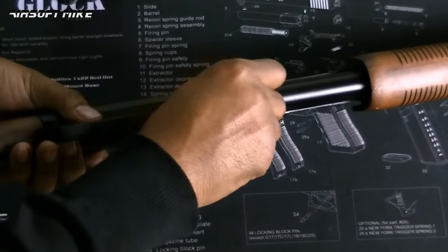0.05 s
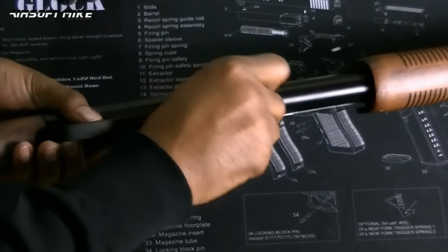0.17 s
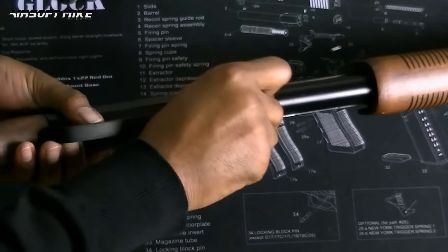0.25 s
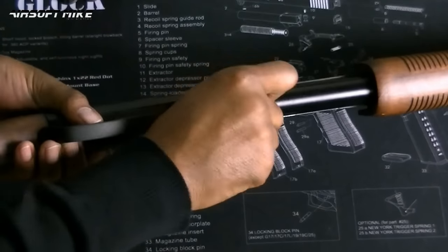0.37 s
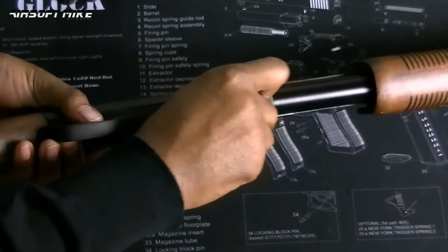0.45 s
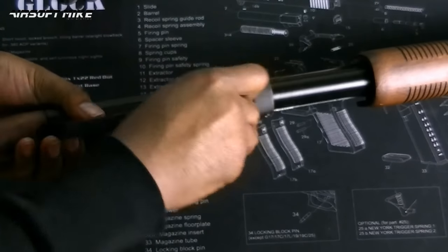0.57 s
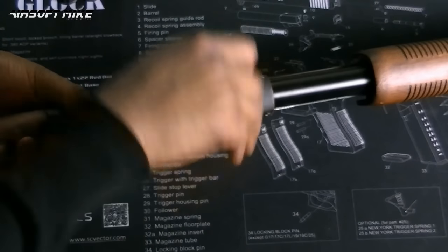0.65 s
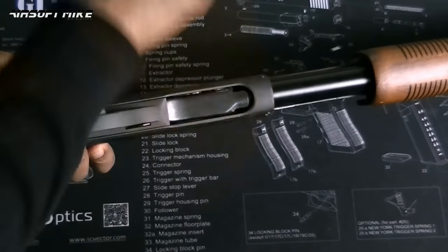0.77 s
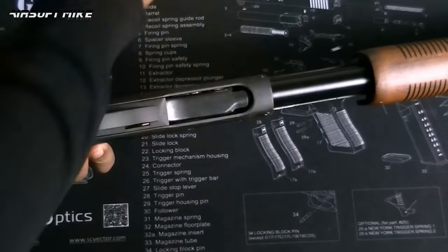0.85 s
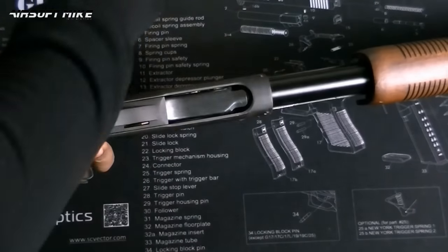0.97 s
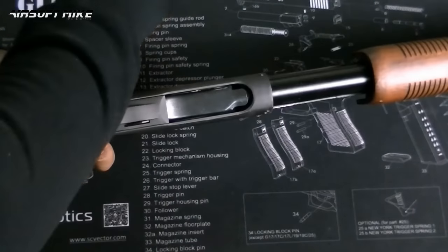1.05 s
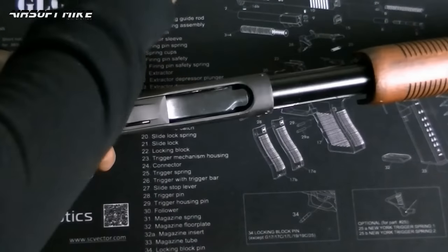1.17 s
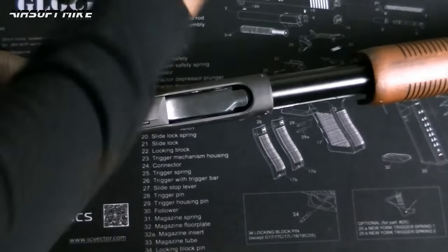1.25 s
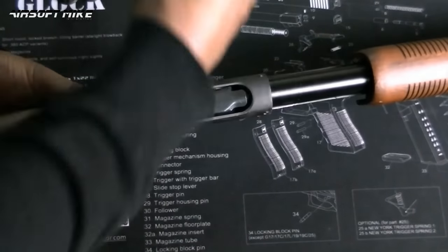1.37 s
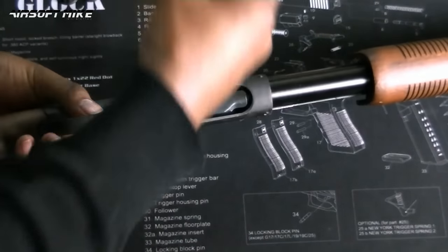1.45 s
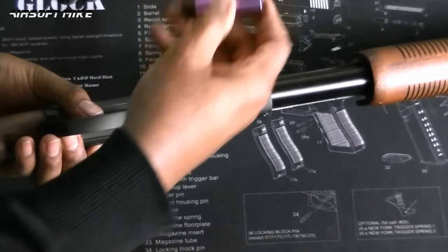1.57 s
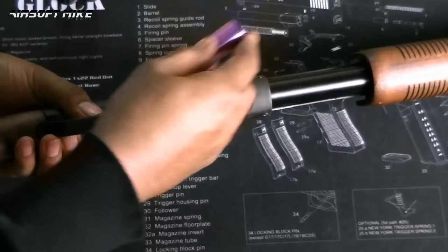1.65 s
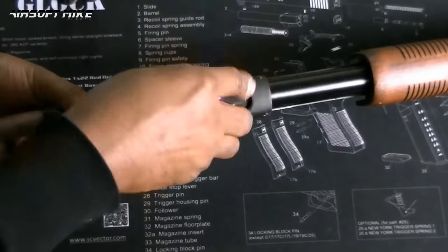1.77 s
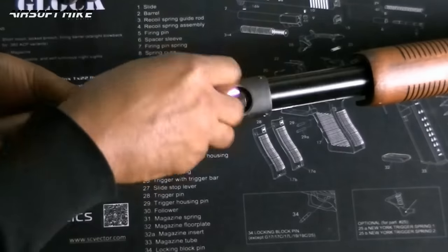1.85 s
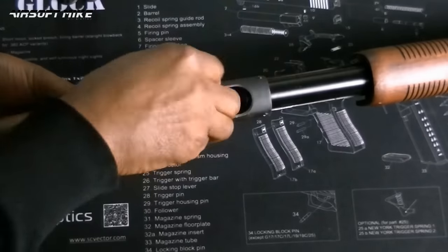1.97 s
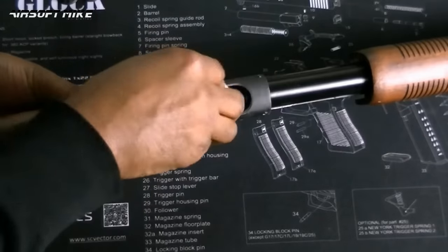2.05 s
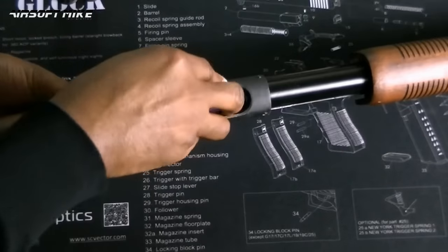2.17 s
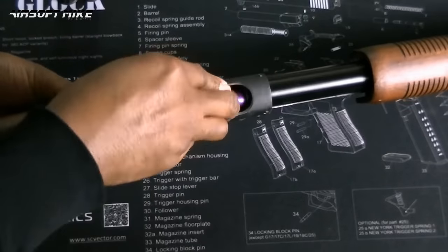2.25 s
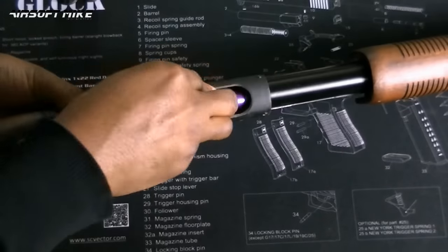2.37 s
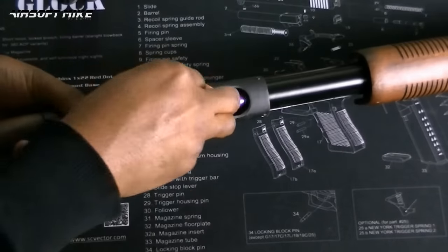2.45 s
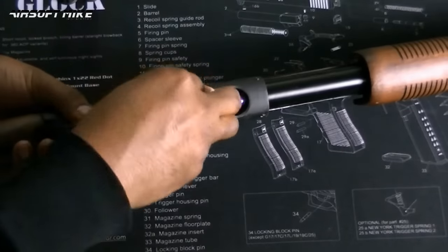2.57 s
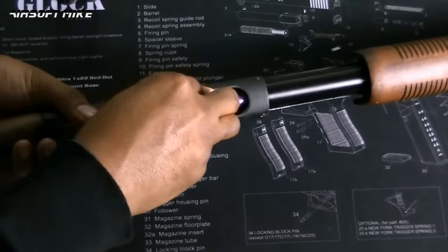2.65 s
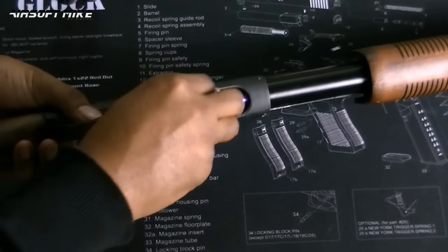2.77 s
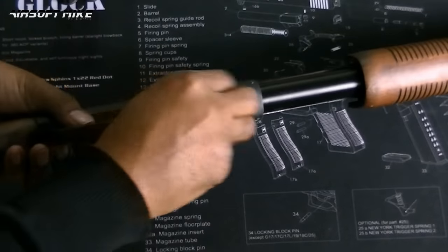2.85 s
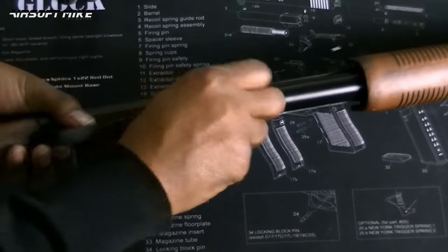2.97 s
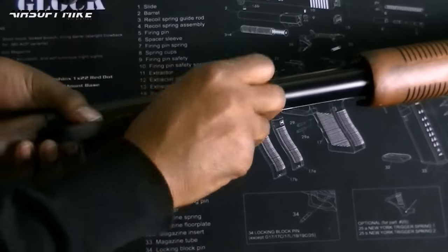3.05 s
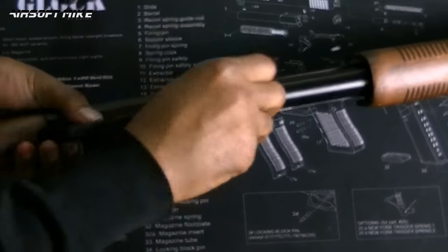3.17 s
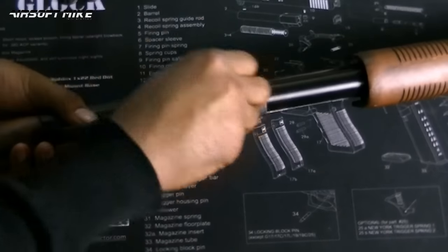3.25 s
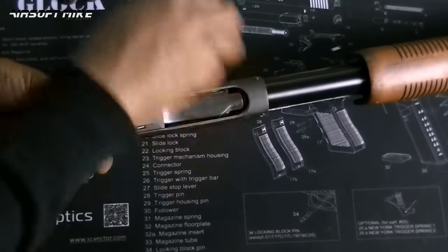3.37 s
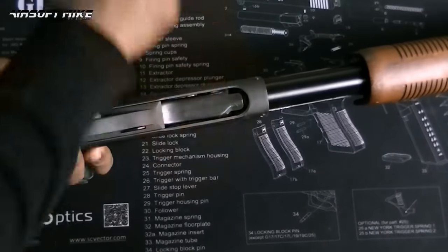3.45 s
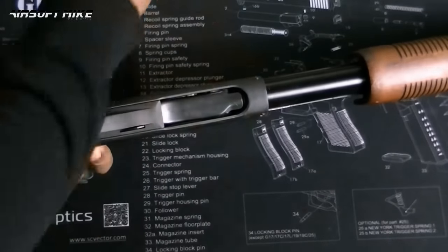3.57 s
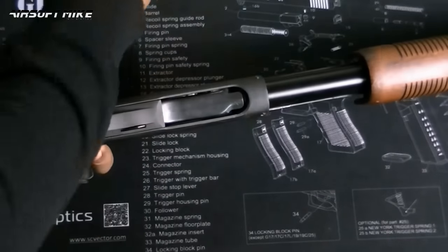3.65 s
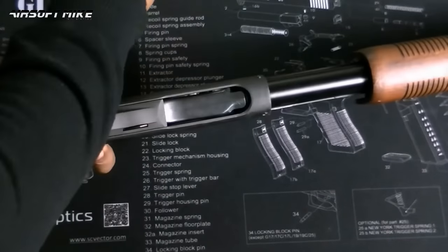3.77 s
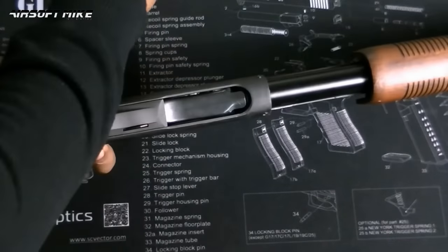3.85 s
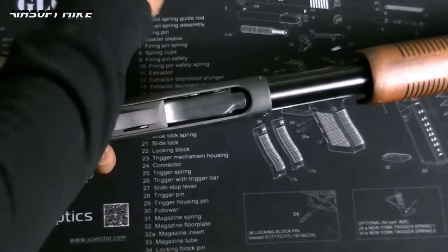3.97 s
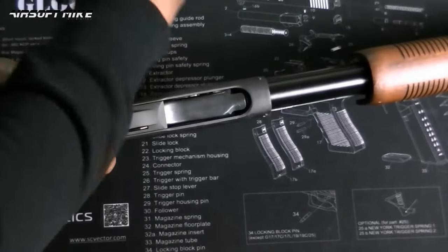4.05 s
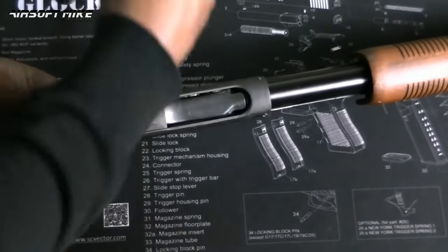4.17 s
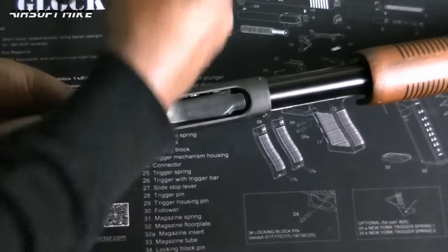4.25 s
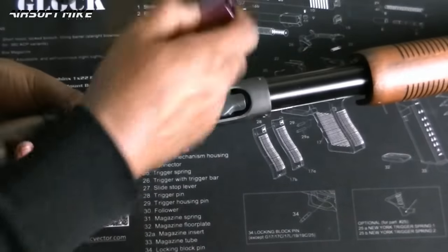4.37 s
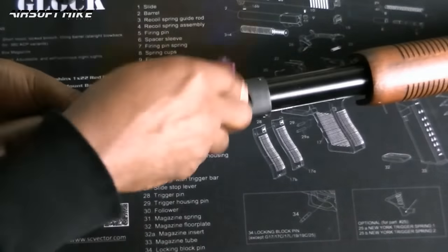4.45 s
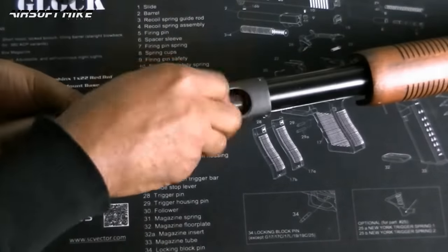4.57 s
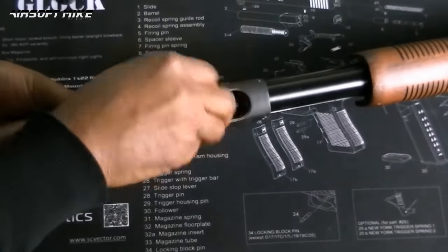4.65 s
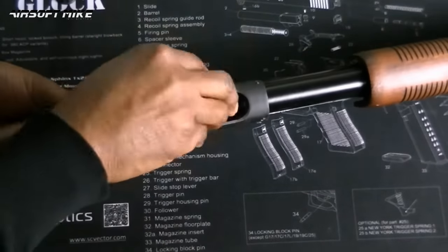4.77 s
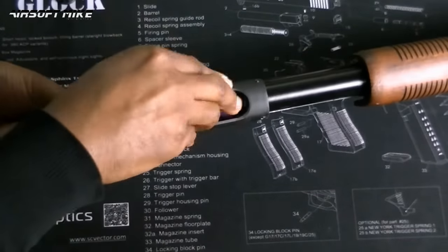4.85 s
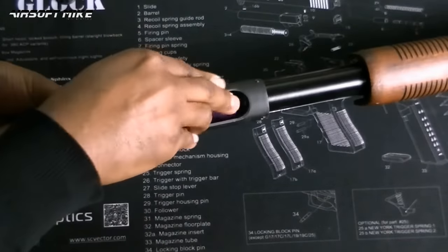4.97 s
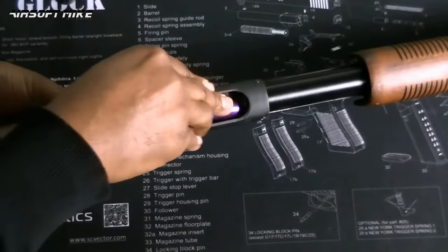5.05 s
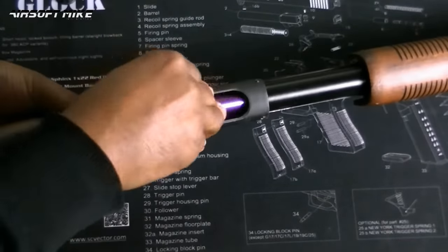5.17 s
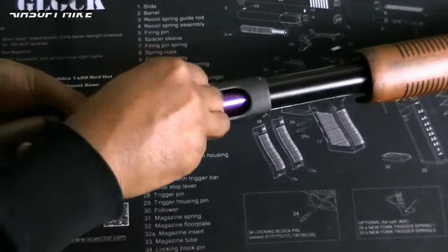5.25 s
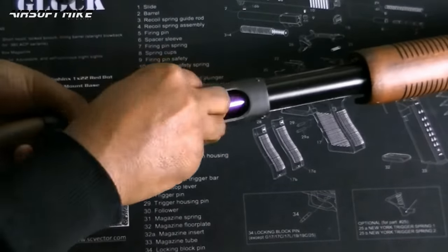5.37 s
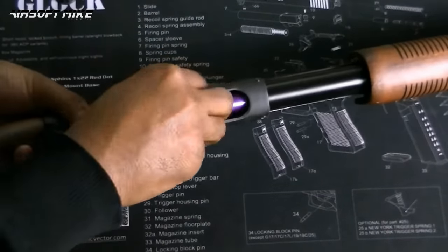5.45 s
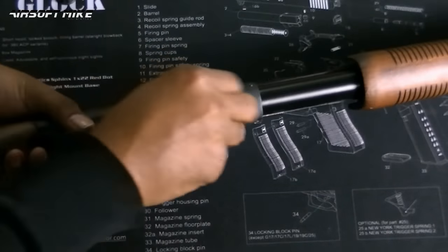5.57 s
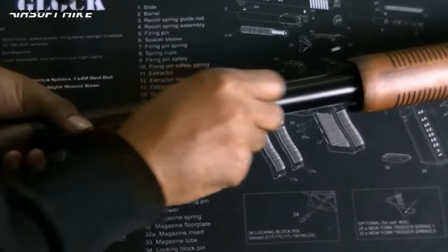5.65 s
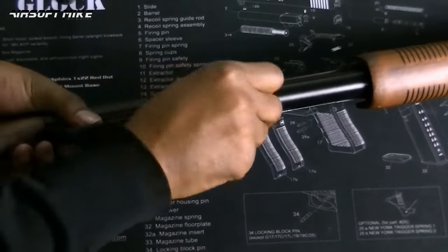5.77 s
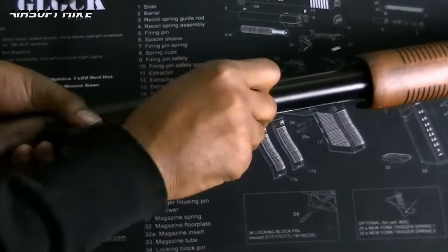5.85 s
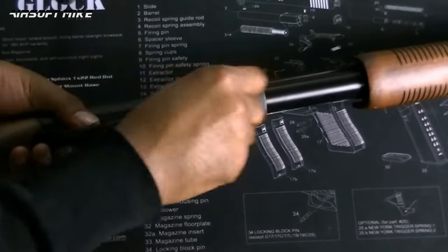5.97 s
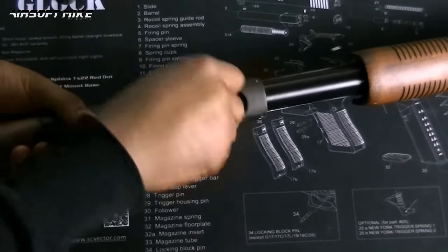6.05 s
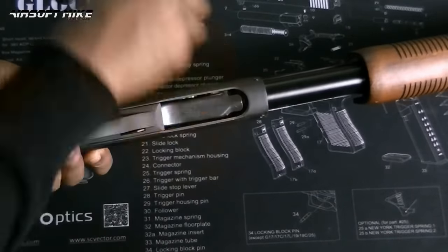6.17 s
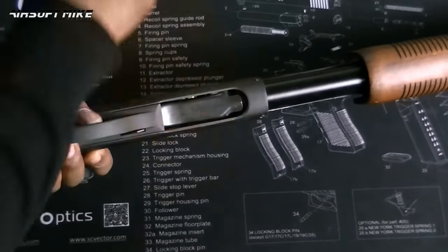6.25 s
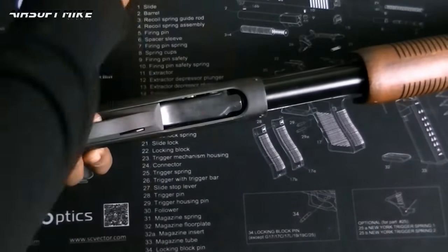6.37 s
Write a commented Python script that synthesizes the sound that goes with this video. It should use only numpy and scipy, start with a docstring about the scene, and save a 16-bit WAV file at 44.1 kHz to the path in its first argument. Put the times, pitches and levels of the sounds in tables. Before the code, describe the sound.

Close-up loading of a toy pump gun: light taps, gritty plastic slides, bright metallic clicks and hollow clacks, with quiet gaps between shells.

```python
"""A short plastic scrape over quiet room tone, then taps, snaps and clacks: three shells go into a toy shotgun.
Each shell taps the loading port, scrapes into the magazine tube and snaps past the catch; the gate clacks shut.
Filtered noise makes the contacts, scrapes, desk bumps and cloth; decaying sines ring the steel and hollow gun;
a wavering pair of sines squeals. Noise tails give a bare, small room, nearly mono, under faint hums and whines."""
import sys
import numpy as np
from scipy import signal
from scipy.fft import rfft, irfft, next_fast_len
from scipy.io import wavfile
from scipy.ndimage import uniform_filter1d, map_coordinates

SR = 44100
rng = np.random.default_rng(int(sys.argv[2]) if len(sys.argv) > 2 else 0)


def wrap_up_sound(samples):
    """Save the sound to the file named by the first command line argument, as 16-bit audio."""
    columns = np.atleast_2d(samples).T
    # keep every value between -1 and 1, then stretch to whole-number steps
    tamed = np.clip(columns, -1, 1)
    steps = np.round(tamed * 32767).astype(np.int16)
    wavfile.write(sys.argv[1], SR, steps)


N = 282681  # length in samples


def amp(db):
    """Decibels to linear gain."""
    return 10 ** (np.asarray(db) / 20)


def evened(x):
    """Scale to an rms of one."""
    return x / np.sqrt(np.mean(x ** 2) + 1e-20)


def read(points, hz):
    """Read a curve of (frequency, value) points, straight between them on a log-frequency axis."""
    f, value = np.transpose(points)
    return np.interp(np.log(hz + 1), np.log(f + 1), value)


def add(mix, s, sound):
    """Lay a sound into the mix at s seconds, cut off at the end."""
    part = mix[max(round(s * SR), 0):][:len(sound)]
    part += sound[:len(part)]


def colour(x, points, size=4096):
    """Minimum-phase filter with the given spectrum, so that nothing sounds before its cause."""
    log_gain = np.log(amp(read(points, abs(np.fft.fftfreq(size, 1 / SR)))))
    taps = np.fft.ifft(np.exp(np.conj(signal.hilbert(log_gain)))).real
    return signal.fftconvolve(x, taps[:size // 2])[:len(x)]


def band(x, edges, order=3):
    """Butterworth band-pass between two edges in Hz."""
    return signal.sosfilt(signal.butter(order, edges, "band", fs=SR, output="sos"), x)


def ring(modes, t, spread=0.):
    """Dying sines; the grip of the hand detunes them a little each time."""
    total = 0
    for hz, db, t60 in modes:
        detuned_hz = hz * (1 + spread * rng.standard_normal())
        total = total + amp(db - 60 * t / t60) * np.sin(2 * np.pi * detuned_hz * t)
    return total


def grit(size, spread_db, lump_db=1.0):
    """Dense tiny impacts of uneven strength, bunched where a surface catches."""
    strength = np.repeat(rng.standard_normal(size // 32 + 1), 32)[:size]
    lumps = evened(uniform_filter1d(rng.standard_normal(size), size=260))
    unevenness_db = spread_db * np.clip(strength, -2, 2) + lump_db * lumps
    return evened(rng.standard_normal(size) * amp(unevenness_db))


# colour of the room noise: (f/Hz, gain/dB)
AIR_COLOUR = [(15, -52.5), (25, -12), (141, -5.5), (285, -5.5), (335, -8.5), (405, -7.5), (641, -10),
              (1190, -12.5), (1370, -12), (1480, -15.5), (2110, -16), (4740, -24), (6560, -28),
              (14400, -41), (16000, -56.5)]
# left-right likeness of the room noise: (f/Hz, correlation)
AIR_LIKENESS = [(40, .9), (120, 0.74), (400, 0.69), (2000, 0.09), (10000, 1)]
# faint narrow hums and whines in the room: (f/Hz, level/dB rms, width/Hz)
HUM_LINES = [(148.4, -70.5, 5), (199, -71.5, 8.7), (424.8, -75, 6.1), (3160, -77, 50), (4140, -81, 25)]
AIR_DB = -58


def air():
    """Steady coloured room noise, partly shared by the channels, plus narrow noise bands that come and go."""
    hz = np.fft.rfftfreq(N, 1 / SR)
    left, other, hum = rfft(rng.standard_normal((3, N)))
    alike = np.clip(read(AIR_LIKENESS, hz), -1, 1)
    right = alike * left + np.sqrt(1 - alike ** 2) * other
    noise = evened(irfft(np.array([left, right]) * amp(read(AIR_COLOUR, hz)), N))
    lines = 0
    for line_hz, db, width_hz in HUM_LINES:
        lines = lines + amp(db) * evened(np.exp(-((hz - line_hz) / width_hz) ** 2))
    return amp(AIR_DB) * noise + irfft(hum * lines, N)


# colours of the bright scrape and of the low rub: (f/Hz, gain/dB)
SCRAPE_COLOUR = [(1500, -44), (2800, -7.5), (3250, -2), (3800, -8.5), (4550, -2), (5100, -3), (5700, 0),
                 (7200, -11.5), (7900, -12.5), (9000, -14), (10600, -13), (12500, -22.5), (16000, -28.5)]
RUB_COLOUR = [(80, -24.5), (300, -17), (600, -12.5), (900, -3), (1200, 0.5), (1800, 0), (2600, -1.5),
              (4000, -13), (9000, -46)]
# strokes of the thumb that slide a shell along the tube, levels before the push envelope:
# (t/s, length/s, scrape level/dB, low rub level/dB)
THUMB_STROKES = [(0.0,0.031,-30.5,-37.5), (0.044,0.077,-34.5,-44.5), (0.41,.03,-33,-43.5),
                 (0.538,.012,-39,-37), (0.549,0.072,-31,-40), (2.841,0.1,-29.5,-35.5),
                 (2.938,.072,-28,-42.5), (5.134,.026,-61,-40), (5.611,0.082,-30,-36.5),
                 (6.003,0.029,-45.5,-46)]
STROKE_ATTACK_S, STROKE_RELEASE_S = 0.0047, 0.0097


def slide(length, scrape_db, rub_db, drift=.012):
    """A shell scrapes along the tube under the thumb: one gritty friction drives a bright and a low colour."""
    t = np.arange(0, length, 1 / SR)
    push = np.minimum(t / STROKE_ATTACK_S, 1) * np.minimum((length - t) / STROKE_RELEASE_S, 1)
    friction = grit(len(t), spread_db=2.4, lump_db=1.5)
    shift = evened(uniform_filter1d(rng.standard_normal(len(t)), SR // 50))
    # the resonances of the scrape drift as the point of contact moves
    position = np.cumsum(1 + drift * shift)
    scrape = map_coordinates(colour(friction, SCRAPE_COLOUR), [position], mode="mirror")
    rub = colour(friction, RUB_COLOUR)
    return push * (amp(scrape_db) * evened(scrape) + amp(rub_db) * evened(rub))


# how fast the reflections die: (f/Hz, t60/s)
ROOM_DECAY = [(200, 0.5), (530, 0.4), (1390, 0.45), (3680, 0.46), (7000, 0.42), (10000, 0.27),
              (15000, 0.37)]


def room(x, gap_s=0.0039, build_s=0.0015, side_db=-16.0):
    """Dense reflections, each band dying at its own speed; the two close ports hear almost the same."""
    size = SR * 3 // 4
    hz, t, z = signal.stft(rng.standard_normal((2, size)), SR, nperseg=256)
    decay = amp(-60 * t / read(ROOM_DECAY, hz)[:, None])
    tail = signal.istft(z * decay, SR, nperseg=256)[1][:, :size]
    # silent until gap_s, then the reflections build up
    tail = tail * (1 - np.exp(-np.maximum(np.arange(size) / SR - gap_s, 0) / build_s))
    mid, side = signal.fftconvolve(x[None], tail / np.linalg.norm(tail[0]), axes=1)[:, :N]
    return np.array([mid + amp(side_db) * side, mid - amp(side_db) * side])


# modes of the struck steel: (f/Hz, level/dB relative, t60/s)
STEEL_MODES = [(1696, -6.5, 0.0094), (4515, 1, 0.047), (4570, 7.5, 0.013), (5100, -18.5, .02),
               (6490, -22, 0.043), (9700, -21, .025)]
# a shell strikes a steel part and sets it ringing: (t/s, level/dB over the first 6 ms)
STEEL_PINGS = [(0.017,-49), (1.9665,-32), (2.034,-27.5), (2.4021,-22.5), (3.0194,-18.5), (4.63,-21),
               (4.7768,-25), (4.853,-40), (5.19,-23.5), (5.256,-24)]


def ping(level_db, rise_s=.00015):
    """Steel rings for a moment before the hand damps it: slightly detuned, dying sines."""
    t = np.arange(SR // 10) / SR
    onset = 1 - np.exp(-t / rise_s)
    sound = band(ring(STEEL_MODES, t, spread=0.02) * onset, (900, 14000), order=2)
    return amp(level_db) * sound / np.std(sound[:SR // 160])


# colour of a plastic contact: (f/Hz, gain/dB)
CONTACT_COLOUR = [(60, -37), (200, -27), (500, -17.5), (700, -12.5), (950, 4), (1200, -2.5), (1720, 4),
                  (2400, 0.5), (3400, 3.5), (3950, -1), (4700, 3), (5900, -4), (10500, -13.5), (16000, -23)]
# contacts of shell, catch or gate:
# (t/s, level/dB over the first 6 ms, brightness/dB per octave, chatter t60/s)
CONTACTS = [(0.1026,-19,-3,0.025), (0.1139,-23.5,1,0.025), (0.196,-21.5,-2.5,0.031),
            (0.2055,-13.5,0.6,0.015), (0.2785,-24,-1,0.052), (0.549,-26.5,-3.5,0.05), (0.5971,-19,-1,0.066),
            (0.6111,-22.5,-3,0.021), (0.622,-21.5,-3.5,0.0092), (0.643,-27,-2,0.0066),
            (0.715,-26,-1.5,0.016), (1.9667,-27,3.5,0.02), (1.9795,-29,-3.5,0.043), (2.034,-25,-3.5,.018),
            (2.069,-27.5,-3,0.019), (2.227,-28.5,-5.6,0.019), (2.259,-27,-1.4,0.033), (2.3243,-42.5,0,.022),
            (2.3453,-31,-1.7,0.03), (2.383,-20.5,-5,0.02), (2.4026,-17,2.5,0.042), (2.485,-25.5,0.4,0.033),
            (2.6496,-35,1.7,.024), (2.76,-44,-2,0.1), (2.826,-40.5,-4,0.078), (2.8395,-21,-3,0.042),
            (3.003,-18,-0.9,0.047), (3.0188,-19.5,-.9,0.022), (3.0464,-17,1,0.034),
            (3.2702,-29.5,-1.5,0.026), (3.3943,-25.5,-1.2,0.029), (4.63,-23,-0.9,0.022),
            (4.7136,-20,-2.3,.04), (4.7767,-27,-4.8,.023), (4.8785,-35,-5.5,0.042), (4.898,-34,-7,0.031),
            (5.0776,-32.5,-3.5,0.075), (5.151,-23.5,-5.5,0.041), (5.1912,-18,3,0.033),
            (5.2508,-20.5,1.4,0.011), (5.2554,-20.5,-0.2,.018), (5.4107,-24,0.5,.055),
            (5.5444,-27.5,-3.5,0.06), (5.5505,-26,-2,.02), (5.566,-27.5,3.5,0.039), (5.7297,-24,-0.5,.026),
            (5.736,-19,0.5,0.049), (5.7418,-15.5,-1,0.033), (5.7517,-18.5,2,.022), (6.0232,-25,-3.5,0.075),
            (6.0327,-17.5,-1.5,0.051), (6.047,-17.5,-1,0.022), (6.156,-25,0.8,0.016)]
# brightness tilts the spectrum between these two frequencies
TILT_LOW_HZ, TILT_HIGH_HZ = 845, 11000
# every HARDNESS_DB of brightness halves the rise time and doubles the top, within the limits in click()
HARDNESS_DB = 9
CONTACT_RISE_S, CONTACT_LOW_HZ, CONTACT_TOP_HZ = .00009, 520, 13100


def click(level_db, bright_db, t60, snap=0.78, snap_s=0.00023):
    """A sharp contact, then chatter in plastic; a soft contact builds slower and loses its edge."""
    t = np.arange(SR // 10) / SR
    hardness = 2 ** (bright_db / HARDNESS_DB)
    chatter = amp(-60 * t / max(t60, .003))
    force = rng.standard_normal(len(t)) * (chatter + snap * np.exp(-t / snap_s))
    force = force * (1 - np.exp(-t * hardness / CONTACT_RISE_S))
    tilt = [(TILT_LOW_HZ, 0), (TILT_HIGH_HZ, bright_db * np.log2(TILT_HIGH_HZ / TILT_LOW_HZ))]
    top_hz = np.clip(CONTACT_TOP_HZ * hardness, 3000, 13000)
    sound = band(colour(colour(force, CONTACT_COLOUR), tilt), (CONTACT_LOW_HZ, top_hz), order=2)
    return amp(level_db) * sound / np.std(sound[:SR // 160])


# colour of the knock on the padded desk: (f/Hz, gain/dB)
BUMP_COLOUR = [(60, -40.5), (150, -22.5), (250, -3.5), (320, -7.5), (420, 1), (650, 0), (1000, -15.5),
               (4000, -58.5)]
# the gun bumps the padded desk: (t/s, level/dB over the first 40 ms)
DESK_BUMPS = [(0.104,-47.5), (0.2,-47), (0.608,-44.5), (0.715,-52.5), (2.842,-56), (3.005,-46.5),
              (3.047,-51), (3.272,-49.5), (3.395,-53), (5.251,-45), (5.412,-45.5), (5.617,-50),
              (5.74,-44.5), (6.036,-39), (6.156,-53)]


def bump(level_db, t60=0.047):
    """A soft, dull knock: a short burst of noise through the colour of the desk."""
    t = np.arange(SR // 5) / SR
    sound = colour(rng.standard_normal(len(t)) * amp(-60 * t / t60), BUMP_COLOUR)
    return amp(level_db) * sound / np.std(sound[:SR // 25])


# colour of the loose parts: (f/Hz, gain/dB)
RATTLE_COLOUR = [(60, -56), (170, -43), (300, -36), (480, -15.5), (620, -12), (780, -2.5), (1500, 4),
                 (2400, 0), (3200, 1.5), (5000, 1.5), (7500, -5.5), (9300, -17), (11000, -11.5),
                 (15000, -32)]
# modes of the hollow receiver: (f/Hz, level/dB relative, t60/s)
HOLLOW_MODES = [(760, -22.5, 0.015), (896.5, 1, 0.1), (950, -4.5, 0.061), (970, -12.5, 0.033),
                (630, -25, .05), (1338, -8, 0.12)]
# the gun shudders after a hard push:
# (t/s, rattle level/dB over the first 50 ms, hollow ring/dB against the rattle, brightness/dB per octave)
GUN_SHUDDERS = [(0.106,-42,-12,-4), (0.207,-31.5,4.5,.8), (0.606,-36.5,2.5,0), (2.386,-50,16.5,-1),
                (2.407,-32,-1,4), (3.008,-30,-31,-1.3), (3.048,-29,-2.5,-3), (3.273,-50.5,5.5,0),
                (4.716,-42,-2.5,-2.5), (5.152,-41,4,-2.5), (5.254,-38,-6,-0.5), (5.625,-38,1.5,6.5),
                (5.747,-26,-5.5,-2), (6.038,-31,-13,-0.9)]


def shudder(level_db, hollow_db, bright_db, rise_s=0.0047, fade_s=0.044):
    """Loose parts rattle for a moment and the hollow receiver swells into its ring."""
    t = np.arange(SR // 4) / SR
    swell = (1 - np.exp(-t / rise_s)) ** 2 * np.exp(-t / fade_s)
    rattle = colour(grit(len(t), spread_db=0.0) * swell, RATTLE_COLOUR)
    rattle = colour(rattle, [(400, 0), (12800, bright_db * np.log2(12800 / 400))])
    drive = rng.standard_normal(len(t)) * swell ** 2
    hollow = signal.fftconvolve(drive, ring(HOLLOW_MODES, t, spread=0.0083))[:len(t)]
    hollow = band(hollow, (700, 4000))  # the hollow ring sounds only between 700 Hz and 4 kHz
    head = SR // 20
    return amp(level_db) * (rattle / np.std(rattle[:head]) + amp(hollow_db) * hollow / np.std(hollow[:head]))


# in mid-stroke a shell sticks and slips, level before the swell: (t/s, length/s, level/dB, starting f/Hz)
STICK_SLIPS = [(0.401,0.04,-34,3200), (0.553,0.047,-29,3215), (2.941,0.066,-41,3130),
               (5.599,0.11,-26.5,3123)]
# the pitch wavers, and climbs to its peak at SQUEAL_CLIMB_S; a longer squeal then bends back down
SQUEAL_WIDTH_HZ, SQUEAL_CLIMB_HZ, SQUEAL_CLIMB_S = 42, 191, 0.0814
# a second, weaker mode squeals along
SECOND_MODE_RATIO, SECOND_MODE_DB = 1.74, -14


def squeal(length, level_db, start_hz, catch_db=1.5):
    """Stick and slip sing as a wavering tone that swells and fades, rising as the shell gathers speed."""
    t = np.arange(0, length, 1 / SR)
    waver = evened(uniform_filter1d(rng.standard_normal(len(t)), SR // 300))
    grip = evened(uniform_filter1d(rng.standard_normal(len(t)), SR // 400))
    climb_hz = SQUEAL_CLIMB_HZ * np.sin(np.pi / 2 * t / SQUEAL_CLIMB_S) ** 2
    pitch_hz = start_hz + climb_hz + SQUEAL_WIDTH_HZ * waver
    phase = 2 * np.pi * np.cumsum(pitch_hz) / SR
    modes = np.sin(phase) + amp(SECOND_MODE_DB) * np.sin(SECOND_MODE_RATIO * phase)
    tone = evened(modes * amp(catch_db * grip))
    return amp(level_db) * np.sin(np.pi * t / length) * tone


# colour of two shells touching: (f/Hz, gain/dB)
TICK_COLOUR = [(300, -12), (1300, -17), (2000, -6), (3100, -3), (3700, -5), (4500, 1.5), (5300, 1.5),
               (6500, -9), (10000, -23), (15000, -27)]
# the next shell is picked up and ticks against the others: (t/s, level/dB over the first 6 ms, t60/s)
SHELL_TICKS = [(1.1164, -40.5, 0.04), (3.8697, -38.5, 0.022), (3.966, -44.5, 0.026), (3.9774, -42, 0.026)]


def tick(level_db, t60):
    """Two light shells touch: a dying burst of bright noise."""
    t = np.arange(SR // 10) / SR
    sound = colour(rng.standard_normal(len(t)) * amp(-60 * t / max(t60, .003)), TICK_COLOUR)
    return amp(level_db) * sound / np.std(sound[:SR // 160])


# the sleeve brushes past as the hand fetches a shell, level before the swell:
# (t/s, length/s, level/dB, centre f/Hz)
SLEEVE_RUSTLES = [(1.38,0.17,-71,4980), (4.08,0.18,-73,10000), (4.362,.18,-72,4940)]


def rustle(length, level_db, centre_hz, width=0.17):
    """Cloth brushes by: a soft swell of band-limited, gritty hiss."""
    size = round(length * SR)
    edges = np.clip(centre_hz * np.exp([-width, width]), 100, 16000)
    hiss = band(grit(size, spread_db=3.0), edges, order=2)
    return amp(level_db) * evened(hiss) * np.hanning(size)


# the room hears more of the hollow gun than the microphone does: (f/Hz, gain/dB)
ROOM_SEND_COLOUR = [(100, -3.5), (600, 3), (760, 3.5), (900, 0), (1020, 3), (1200, -2.5), (1700, 0.5),
                    (2400, 1), (4500, -1), (10000, 1.5), (15000, -12)]
# stereo balance: (f/Hz, left minus right/dB)
STEREO_LEAN = [(50, -.4), (150, -1.3), (500, -1.5), (1000, -.9), (2000, -.5), (4000, 0)]


def scene(click_room_db=-4, ping_room_db=-10, tick_room_db=-6, shudder_room_db=-3, slide_room_db=-4,
          squeal_room_db=-9, bump_room_db=-3, count=4):
    """The gun, direct and through the room; its sounds take turns over `count` different room tails."""
    direct, sent = np.zeros(N), np.zeros((count, N))
    sounds = [(s, click(*contact), click_room_db) for s, *contact in CONTACTS]
    sounds += [(s, ping(level_db), ping_room_db) for s, level_db in STEEL_PINGS]
    sounds += [(s, shudder(*shake), shudder_room_db) for s, *shake in GUN_SHUDDERS]
    sounds += [(s, tick(level_db, t60), tick_room_db) for s, level_db, t60 in SHELL_TICKS]
    sounds += [(s, bump(level_db), bump_room_db) for s, level_db in DESK_BUMPS]
    sounds += [(s, slide(*stroke), slide_room_db) for s, *stroke in THUMB_STROKES]
    sounds += [(s, squeal(*slip), squeal_room_db) for s, *slip in STICK_SLIPS]
    sounds += [(s, rustle(*brush), slide_room_db) for s, *brush in SLEEVE_RUSTLES]
    for k, (s, sound, room_db) in enumerate(sounds):
        add(direct, s, sound)
        add(sent[k % count], s, amp(room_db) * sound)
    reflections = sum(room(colour(part, ROOM_SEND_COLOUR)) for part in sent)
    heard = direct + reflections + air()
    size = next_fast_len(N)
    lean_db = read(STEREO_LEAN, np.fft.rfftfreq(size, 1 / SR))
    return irfft(rfft(heard, size) * amp([lean_db / 2, -lean_db / 2]), size)[:, :N]


EDGE_HZ = 16100


def record(dry):
    """The recorder's band limit: a linear-phase low-pass at EDGE_HZ."""
    low_pass = signal.firwin(401, EDGE_HZ, window=("kaiser", 8), fs=SR)
    return signal.oaconvolve(dry, low_pass[None], "same")


dry = scene()
out = record(dry)
wrap_up_sound(out)
```